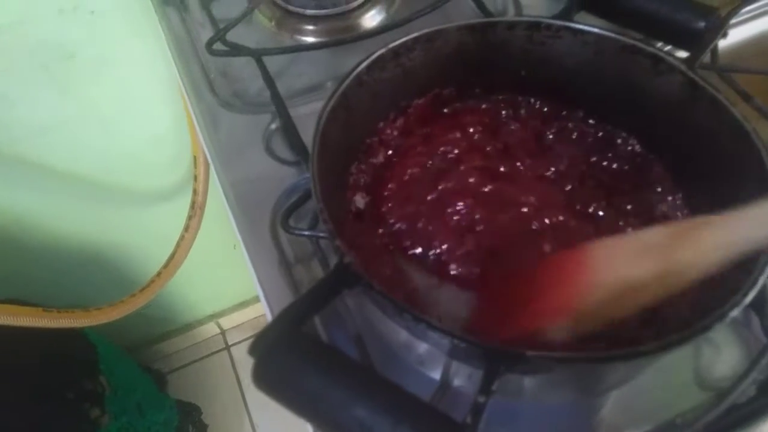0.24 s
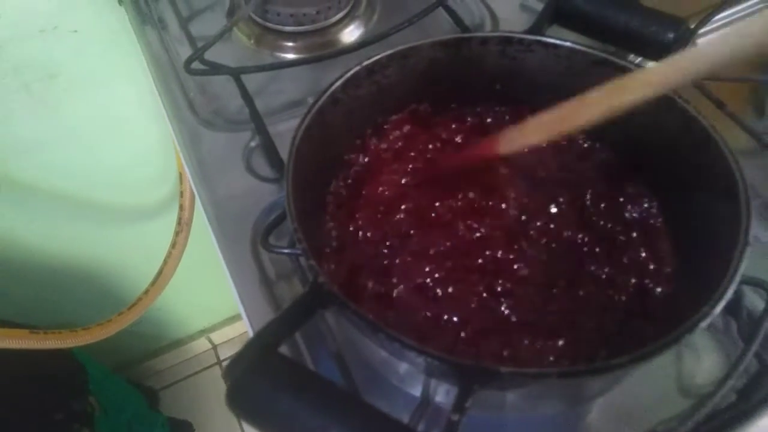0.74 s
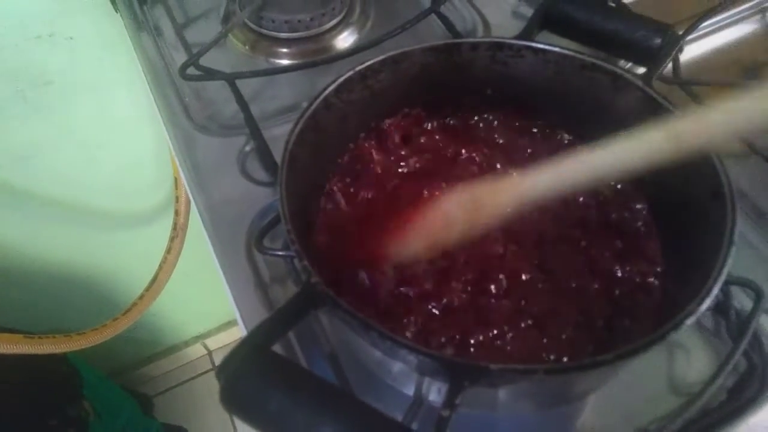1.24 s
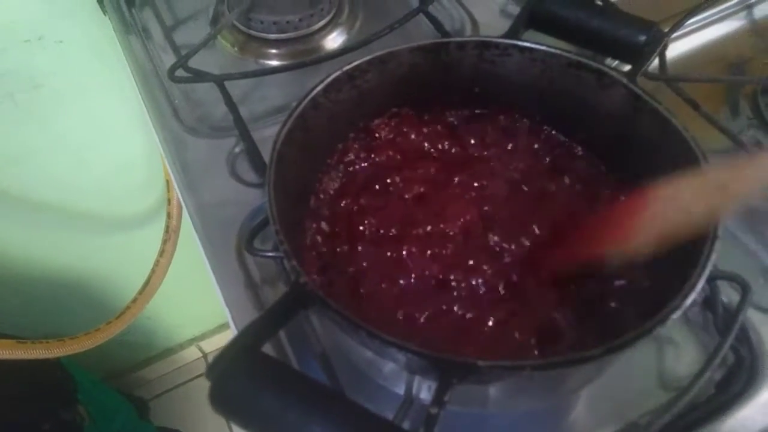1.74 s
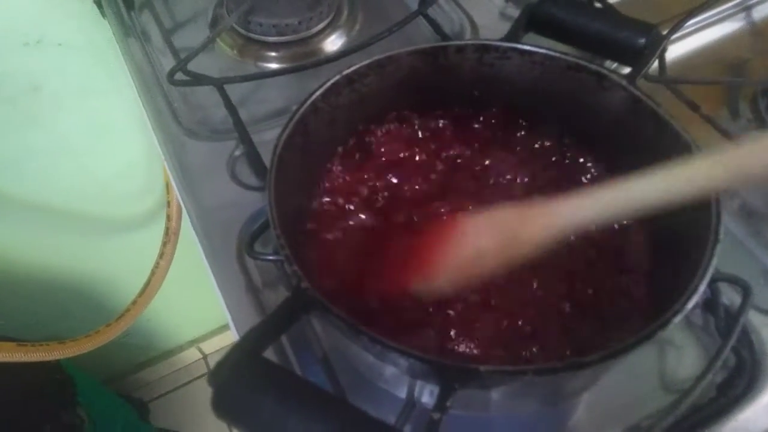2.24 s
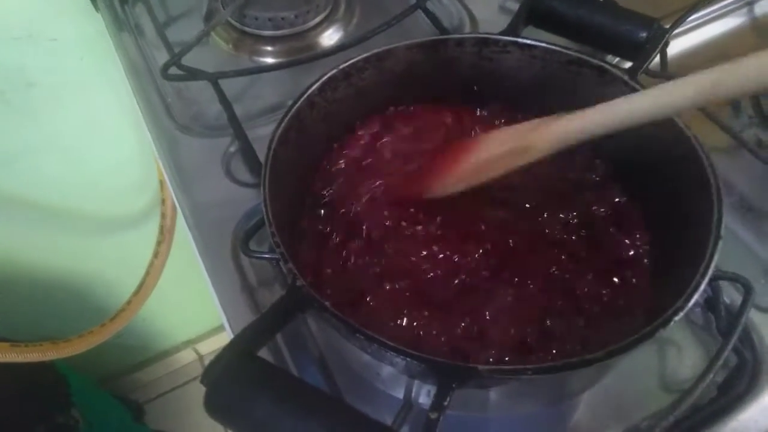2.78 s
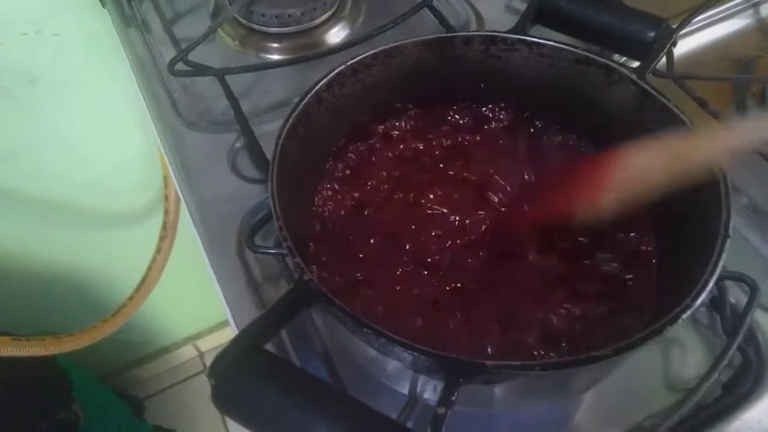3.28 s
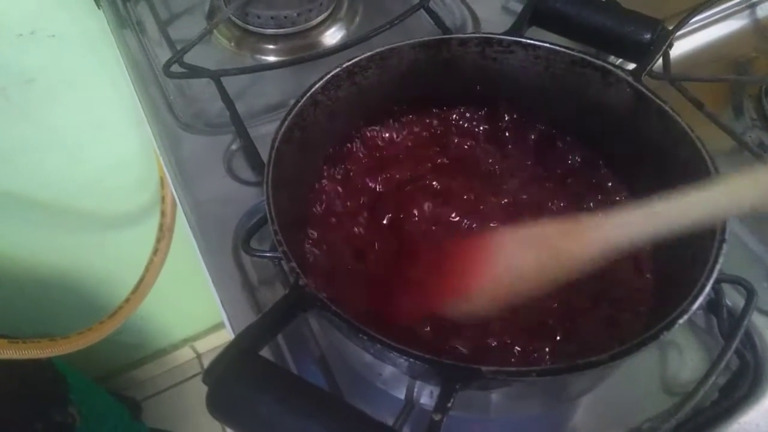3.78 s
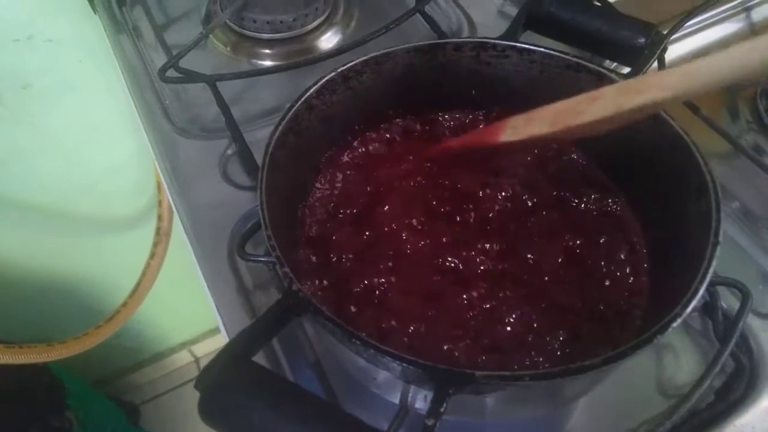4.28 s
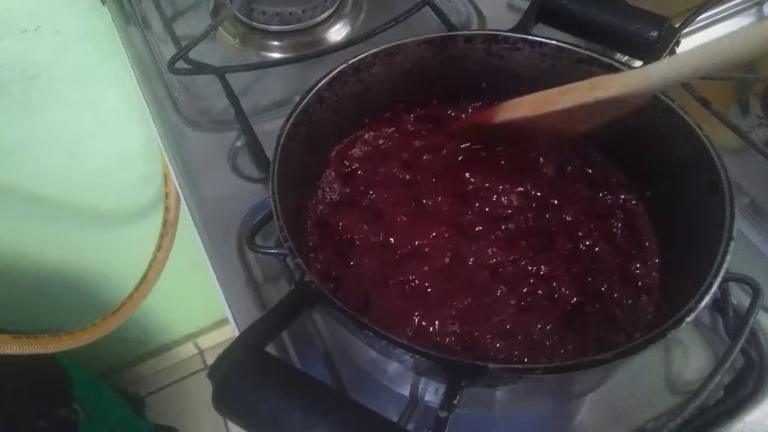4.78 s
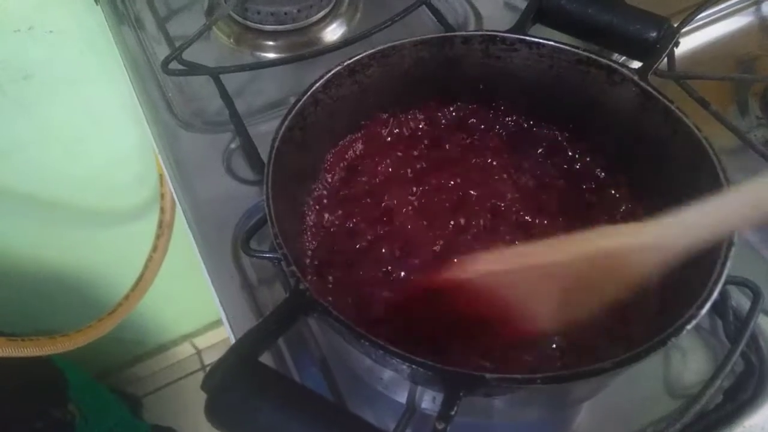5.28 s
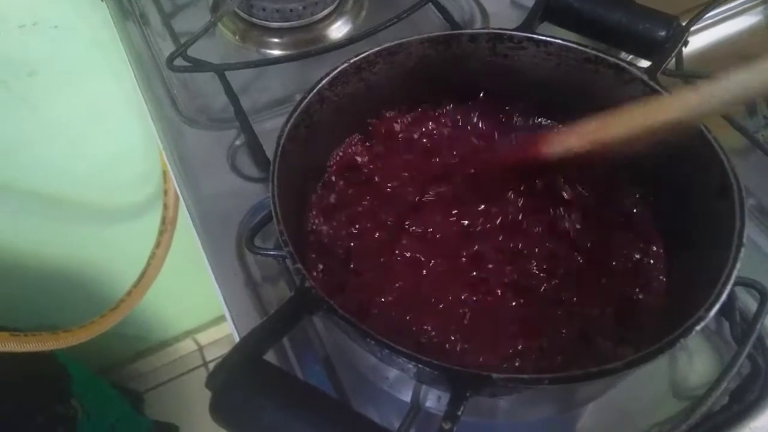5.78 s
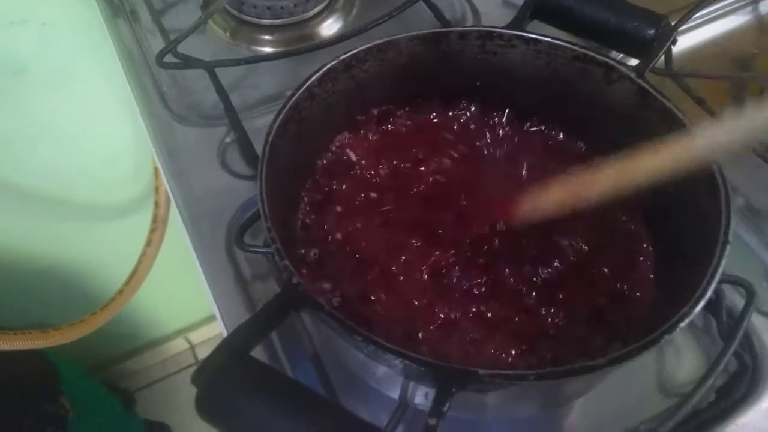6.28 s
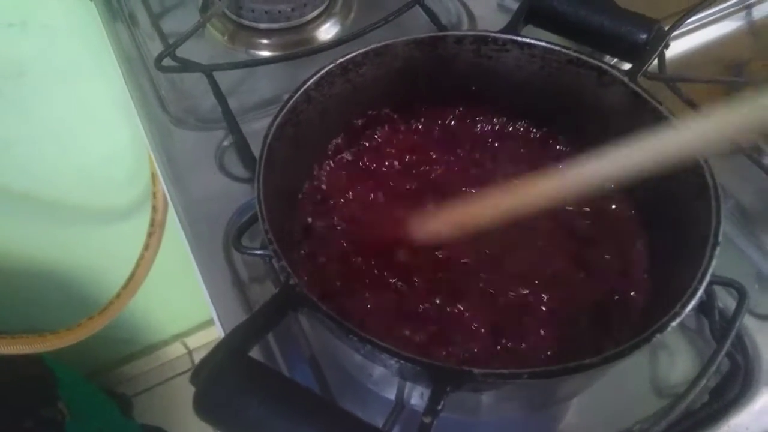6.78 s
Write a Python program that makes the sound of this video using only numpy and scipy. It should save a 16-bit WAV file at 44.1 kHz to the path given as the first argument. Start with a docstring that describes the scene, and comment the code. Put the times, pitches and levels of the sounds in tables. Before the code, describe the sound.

A wooden spoon scrapes and knocks dully in a metal pot while thick syrup bubbles, pops and hisses.

```python
"""First you hear a dull scrape over bubbling and hiss: a wooden spoon stirs thick, boiling syrup.
The spoon slips along the bottom of a metal pot, bubbles ring the air inside, and steam spits out.
Soon bubbles burst with sharp ticks and the spoon knocks the pot. A faint motor hums in the kitchen.
A hand bumps the camera it holds, whose two microphone openings colour the sound differently."""
import sys
import numpy as np
from scipy import signal
from scipy.fft import rfft, irfft, next_fast_len
from scipy.io import wavfile
from scipy.ndimage import uniform_filter1d, map_coordinates

SR = 44100
rng = np.random.default_rng(int(sys.argv[2]) if len(sys.argv) > 2 else 0)


def unload_audio(sound):
    """Save the sound as a 16-bit wav file, at the path given as the first command line argument."""
    columns = np.transpose(np.atleast_2d(sound))
    # keep every value between -1 and 1, then stretch to whole-number steps
    steps = np.round(np.clip(columns, -1, 1) * 32767)
    wavfile.write(sys.argv[1], SR, steps.astype(np.int16))


N = 310020
STEP = 64  # samples between the points of a loudness curve


def amp(db):
    """Turn decibels into a multiplier."""
    return 10 ** (np.asarray(db) / 20)

def unit(x):
    """Scale x to an average power of 1."""
    return x / np.sqrt(np.mean(x ** 2) + 1e-20)

def along(points, hz):
    """Read between (Hz, value) points, with octaves evenly spaced."""
    f, v = np.transpose(points)
    return np.interp(np.log(hz + 1), np.log(f + 1), v)

def curves(rows):
    """One value per sample for each column after the time."""
    s, *cols = np.transpose(rows)
    return [np.interp(np.arange(N) / SR, s, c) for c in cols]

def wobble(rate):
    """A smooth curve through `rate` random values a second."""
    at = np.arange(0, N + STEP, STEP // 4)
    values = rng.standard_normal(int(N * rate / SR) + 4)
    return np.interp(np.arange(N), at, map_coordinates(values, [at * rate / SR]))

def swell(peak_s, hold_s, rise_db_per_s, fall_db_per_s):
    """Each event rises to 0 dB, holds, then falls."""
    t = np.arange(0, N, STEP) / SR - np.reshape(peak_s, (-1, 1))
    rise, hold = np.reshape(rise_db_per_s, (-1, 1)), np.reshape(hold_s, (-1, 1))
    return np.minimum(rise * t, 0) - fall_db_per_s * np.maximum(t - hold, 0)

def together(tops_db, shapes_db, steady_db=-140):
    """The level in dB of overlapping events plus a steady part."""
    power = (amp(np.reshape(tops_db, (-1, 1)) + shapes_db) ** 2).sum(axis=0)
    return 10 * np.log10(np.interp(np.arange(N), np.arange(0, N, STEP), power) + amp(steady_db) ** 2)

def filtered(x, response):
    """Multiply each frequency in x by response(Hz)."""
    m = next_fast_len(N + SR // 2)
    return irfft(rfft(x, m) * response(np.fft.rfftfreq(m, 1 / SR)), m)[..., :N]

def band(x, lo_hz, hi_hz):
    """Keep what lies between two frequencies, at power 1."""
    return unit(filtered(x, lambda f: 1 / (1 + (lo_hz / (f + 1)) ** 10) / (1 + (f / hi_hz) ** 10)))

def peak(f, hz, width_hz):
    """A response that is 1 at hz and falls away on both sides."""
    return 1j * f * width_hz / (hz ** 2 - f * f + 1j * f * width_hz)

def hollow(x, hz, width_hz, depth):
    """Turn x down around hz."""
    return filtered(x, lambda f: 1 - depth * peak(f, hz, width_hz))

def resonance(x, hz, width_hz):
    """Make x ring around hz, at power 1."""
    b, a = signal.iirpeak(hz, hz / width_hz, SR)
    return unit(signal.lfilter(np.convolve(b, b), np.convolve(a, a), x))

def rush(spectrum, alike, patchy_db):
    """Stereo noise with louder and softer patches; alike=1 makes both sides the same."""
    z = signal.stft(rng.standard_normal((2, N)), nperseg=512)[2]
    patches = uniform_filter1d(rng.standard_normal(z.shape[1:]), size=2, axis=0)
    patches = uniform_filter1d(patches, size=9, axis=1)
    a, b = signal.istft(z * amp(patchy_db * unit(patches)), nperseg=512)[1][:, :N]
    turn = np.arccos(alike) / 2
    pair = np.cos(turn) * a + np.sin(turn) * np.array([b, -b])
    return unit(filtered(pair, lambda hz: amp(along(spectrum, hz))))

def grains(start, hz, cycles, gain, size):
    """Tiny tones, `size` samples long, that fade 60 dB in the given cycles."""
    turns = (np.arange(size) / SR * hz[:, None]).astype(np.float32)
    fade = np.exp(-turns * np.float32(np.log(1000) / np.reshape(cycles, (-1, 1))))
    onset = 1 - np.exp(-turns / 0.45)
    tones = gain[:, None] * np.sin(2 * np.pi * turns) * fade * onset
    at = start[:, None] + np.arange(size)
    return np.bincount(at.ravel(), tones.ravel(), N + size)[:N]

def shower(count, spread_db):
    """Random start samples, pitch scatter and strengths for grains."""
    u = rng.random((count, 2))
    gain = amp(-spread_db * np.log(1 - .99 * u[:, 1]))
    return (u[:, 0] * N).astype(int), rng.standard_normal(count), gain


# Drags of the spoon: t/s, rise/s, hold/s, level/dB, f/Hz
SPOON_DRAGS = [(0.0, 0.0067, 0.11, -44, 488), (0.216, 0.046, 0.022, -54.5, 517),
               (0.831, 0.017, 0.006, -38, 452), (1.039, 0.014, 0.029, -36, 538),
               (1.138, 0.03, 0.21, -36, 510), (1.572, 0.014, 0.014, -37.5, 483),
               (1.816, 0.071, 0.0079, -47, 560), (2.18, 0.043, 0.008, -32, 551),
               (2.299, 0.0093, 0.019, -33.5, 541), (2.622, 0.027, 0.046, -40.5, 541),
               (2.881, 0.012, 0.26, -38, 532.4), (3.316, 0.033, 0.21, -45, 558),
               (3.611, 0.053, 0.066, -33.5, 539), (4.632, 0.13, 0.25, -59.5, 488),
               (5.075, 0.098, 0.069, -46, 410), (5.424, 0.13, .01, -55.5, 586),
               (5.809, 0.019, 0.059, -41, 453), (6.046, 0.041, 0.043, -48.5, 474),
               (6.192, 0.036, 0.1, -35.5, 477), (6.408, 0.019, 0.038, -44.5, 490),
               (6.538, 0.056, 0.15, -41, 443), (6.72, 0.025, 0.3, -45.5, 479),
               (6.929, 0.064, 0.021, -29.5, 441)]

def spoon_scrapes():
    """The spoon moves in uneven slips; each briefly rings the bottom and stirs the air in the pot."""
    s, rise_s, hold_s, db, hz = np.transpose(SPOON_DRAGS)
    shape_db = swell(s + rise_s, hold_s, rise_db_per_s=17.5 / rise_s, fall_db_per_s=175)
    loudest = (db[:, None] + shape_db).argmax(axis=0)
    pitch = np.repeat(hz[loudest], STEP)
    start, scatter, gain = shower(count=2000, spread_db=2)
    slips = unit(grains(start, pitch[start] * np.exp(0.1604 * scatter), 36.7, gain, size=1600))
    rasp = unit(grains(start, 1000 * np.exp(0.333 * scatter), 38, gain, size=800))
    return amp(together(db, shape_db)) * (slips + amp(-15) * rasp)

def wood_on_pot(x):
    """A small pot gives little bass, and soft wood little treble."""
    stereo = x * amp([[-.8], [.8]])
    return filtered(stereo, lambda f: (1j * f / (260 + 1j * f)) ** 2 / (1 + 1j * f / 2400) ** 4)


# How long the room rings: f/Hz, time to fade 60 dB/s
ROOM_FADE = [(200, 0.028), (2000, 0.23), (10000, 0.014)]

def kitchen(x, echo_db):
    """Add the room's echo, each frequency dying at its own speed."""
    hz, t, z = signal.stft(rng.standard_normal((2, SR // 2)), SR, nperseg=256)
    tail = signal.istft(z * amp(-60 * t / along(ROOM_FADE, hz)[:, None]), SR, nperseg=256)[1]
    tail = np.pad(tail, ((0, 0), (300, 0))) / np.linalg.norm(tail[0])
    return x + amp(echo_db) * signal.fftconvolve(x, tail, axes=1)[:, :N]


# Notes of the air in the pot: f/Hz, width/Hz, relative level/dB, left over right/dB
POT_NOTES = [(947.4, 95, 0.5, 5.5), (1292, 119, 0, 15), (1882, 151, -1, 18.5), (2060, 138, 7, 9),
             (2340, 143, -2.5, -17.5)]

def pot_air(drive, drift=.035):
    """The air rings at several notes, which wander as the syrup is pushed about."""
    notes = []
    for hz, width_hz, db, pan_db in POT_NOTES:
        blend = np.pi / 4 * (1 + np.tanh(wobble(5)))
        lower = np.cos(blend) * resonance(drive, hz * (1 - drift), width_hz)
        higher = np.sin(blend) * resonance(drive, hz * (1 + drift), width_hz)
        notes.append(amp([[db + pan_db / 2], [db - pan_db / 2]]) * (lower + higher))
    return notes


# Strength of the boil: t/s, lowest note's level/dB, upper notes' level/dB
BOIL_LEVELS = [(0.0, -51, -46), (0.21, -58.5, -52.5), (0.35, -64, -74), (0.43, -52, -61),
               (0.74, -73.5, -68.5), (1.06, -57, -76), (1.13, -59, -66), (1.19, -51.5, -52.5),
               (1.51, -60, -69.5), (1.74, -47.5, -60), (2.15, -63.5, -61.5), (2.23, -45, -48),
               (2.31, -50.5, -56.5), (2.56, -53, -62), (2.92, -48, -47), (3.19, -52.5, -62),
               (3.8, -43, -47.5), (3.93, -68, -74), (4.05, -52, -62.5), (4.25, -62, -60.5),
               (5.33, -50.5, -57.5), (5.38, -70, -69), (5.52, -59.5, -57.5), (5.8, -59.5, -73),
               (5.87, -54.5, -51), (6.02, -64.5, -67), (6.13, -58, -66.5), (6.19, -45, -47.5),
               (6.36, -62.5, -56), (6.99, -60.5, -55)]
# Gurgles of the pot's second note: t/s, hold/s, level/dB
GURGLE_SWELLS = [(0.103, 0.036, -65), (0.897, 0.087, -59), (1.16, 0.065, -62), (1.857, 0.2, -63.5),
                 (2.24, 0.017, -57), (2.393, 0.013, -58), (2.633, 0.051, -54.5), (2.97, 0.12, -62.5),
                 (3.331, 0.099, -57.5), (3.632, 0.14, -56), (4.022, 0.11, -60), (4.693, 0.023, -67),
                 (5.097, 0.1, -63), (5.457, 0.21, -63.5), (5.835, 0.011, -59.5), (6.175, 0.21, -57),
                 (6.74, 0.17, -58)]

def boil():
    """Bubbles under the surface make soft thuds and a murmur that ring the air in the pot."""
    low_db, upper_db = curves(BOIL_LEVELS)
    s, hold_s, db = np.transpose(GURGLE_SWELLS)
    gurgle_db = together(db, swell(s, hold_s, rise_db_per_s=202, fall_db_per_s=138), steady_db=-79)
    start, scatter, gain = shower(count=2500, spread_db=2.5)
    thuds = unit(grains(start, 1500 * np.exp(0.81 * scatter), 1.72, gain, size=300))
    murmur = rush([(500, 0), (3000, 0)], alike=0.3, patchy_db=4.5) * amp(1.63 * wobble(4))
    low, gurgle, *rest = pot_air(0.54 * thuds + murmur)
    thin_tone = amp(-4.5) * np.sin(2 * np.pi * 850 * np.arange(N) / SR + 0.81 * wobble(5.5))
    upper = unit(sum(amp(3 * wobble(14)) * note for note in rest))
    low = amp(low_db + 2.2 * wobble(9)) * (low + thin_tone)
    return low + amp(gurgle_db) * gurgle + amp(upper_db) * upper


# Tone colour of the hiss: f/Hz, relative level/dB
HISS_COLOUR = [(2300, 0.5), (3050, 0), (3830, 2.5), (4700, -2.5), (5000, -10.5), (5500, -5.5), (7300, 3),
               (9000, 3.5), (10500, 2.5), (12600, -10.5), (14000, -23.5), (15600, -13.5)]
# Notes of the simmer: f/Hz, width/Hz, relative level/dB
SIMMER_NOTES = [(3576, 100, 5.5), (4135, 320, 18), (4520, 190, 11)]
# Steady flow of steam: t/s, low part's level/dB, bright part's level/dB
STEAM_FLOW = [(0.0, -52.5, -87), (0.27, -78, -50.5), (0.51, -94, -63.5), (0.78, -69, -64.5),
              (1.11, -72.5, -58), (1.39, -68, -58.5), (1.84, -61, -59), (2.17, -53, -56.5),
              (2.56, -58.5, -63), (2.78, -51, -55.5), (2.96, -60.5, -65.5), (3.23, -53.5, -62.5),
              (3.46, -52, -63), (3.6, -50.5, -62), (3.7, -51, -60), (3.82, -68, -70), (4.03, -58.5, -62.5),
              (4.21, -61.5, -55.5), (4.4, -56, -63), (4.58, -66.5, -63.5), (4.84, -55.5, -66.5),
              (5.19, -53.5, -55), (5.6, -66, -64.5), (6.15, -65, -65), (6.21, -51.5, -59),
              (6.34, -61.5, -64.5), (6.58, -67.5, -67.5), (6.73, -63, -72), (7.03, -52.5, -52.5)]
# Spurts of steam, each with its own loudness: t/s, hold/s, bright part's level/dB, top part's level/dB
STEAM_SPURTS = [(0.0, 0.052, -45, -47.5), (0.127, 0.012, -46, -53), (1.184, 0.014, -47, -44),
                (1.412, 0.089, -48.5, -53.5), (1.568, 0.042, -46, -78), (1.763, 0.011, -48, -111),
                (2.239, 0.0089, -50, -62), (2.336, 0.015, -51, -63), (2.546, 0.0089, -73, -59),
                (2.728, 0.033, -62, -72), (2.901, 0.07, -54.5, -61), (3.033, 0.015, -52, -55),
                (3.295, 0.026, -70, -56), (3.44, 0.066, -45.5, -48), (3.614, 0.024, -43.5, -43),
                (3.755, 0.016, -44, -53.5), (4.736, 0.016, -51.5, -56.5), (5.055, 0.19, -52, -82),
                (5.27, .01, -69, -58), (5.503, 0.077, -45.5, -46.5), (5.92, 0.007, -47.5, -59),
                (6.268, 0.026, -69, -59), (6.556, 0.013, -64, -61), (6.615, 0.13, -47, -75),
                (6.807, 0.099, -53.5, -67)]

def steam():
    """Escaping steam simmers, fizzes and crackles. Faint, brief high tones dot the hiss."""
    def colour(x):
        return unit(filtered(x, lambda f: amp(along(HISS_COLOUR, f))))
    start, scatter, gain = shower(count=10000, spread_db=4)
    fizz = grains(start, np.clip(7500 * np.exp(0.28 * scatter), 2000, 16000), 14, gain, size=100)
    start, scatter, gain = shower(count=2500, spread_db=-2)
    tone_hz = np.clip(7500 * np.exp(0.42 * scatter), 2500, 16000)
    brief_tones = grains(start, tone_hz, 215, gain, size=1200)
    jet = rush(HISS_COLOUR, alike=0.022, patchy_db=6) + 0.08 * colour(fizz) + 0.35 * colour(brief_tones)
    murmur = rush([(4000, 0)], alike=.3, patchy_db=5) + .15 * unit(fizz)
    simmer = unit(sum(amp(db + 3.5 * wobble(6.2)) * resonance(murmur, hz, width_hz)
                      for hz, width_hz, db in SIMMER_NOTES))

    low_db, steady_db = curves(STEAM_FLOW)
    s, hold_s, spurt_bright_db, spurt_top_db = np.transpose(STEAM_SPURTS)
    shape_db = swell(s, hold_s, rise_db_per_s=453, fall_db_per_s=286)
    bright_db = together(spurt_bright_db, shape_db, steady_db)
    top_db = together(spurt_top_db, shape_db, steady_db - 9)
    low = amp(low_db) * (simmer + 0.56 * band(jet, 2100, 5400))

    start, scatter, gain = shower(count=1500, spread_db=8.5)
    gain = gain * amp(4 * wobble(11))[start]  # loud ticks come in clusters
    crackle = grains(start, np.clip(8000 * np.exp(0.38 * scatter), 3500, 15000), 130, gain, size=700)
    sputter = (jet + .7 * colour(crackle)) * amp(2 * wobble(70))
    bright = amp(bright_db + 2 * wobble(11)) * band(sputter, 3040, 8620)
    top = amp(top_db + 3.3 * wobble(17)) * band(sputter, 11350, 28000)
    return low + bright + top


# High notes of the pot: f/Hz, boost/dB
SHEEN_NOTES = [(4620, 4), (5450, 1), (6000, 6), (6500, 5), (7450, 4), (8100, 5), (8900, 5.5)]

def pot_sheen(x, width_hz=200):
    """The pot's high notes lift narrow bands of x; the overall power stays the same."""
    def lift(f):
        return np.prod([1 + (amp(db) - 1) * peak(f, hz, width_hz) for hz, db in SHEEN_NOTES], axis=0)
    return unit(filtered(x, lift)) * np.sqrt(np.mean(x ** 2))


# Tone colour of the rumble: f/Hz, relative level/dB
RUMBLE_COLOUR = [(15, -51), (25, -11), (59, 20), (140, 8.5), (172, 7.5), (200, -18), (260, -30), (340, -39),
                 (570, -120)]
# Bumps of the hand: t/s, hold/s, level/dB
HAND_BUMPS = [(0.123, .02, -46), (0.184, 0.012, -41.5), (0.887, 0.036, -58), (1.454, 0.018, -60),
              (1.557, 0.2, -57.5), (2.232, 0.028, -55), (2.407, 0.17, -64), (3.49, 0.16, -57),
              (4.763, .05, -60), (5.575, 0.021, -59), (5.897, 0.031, -57), (6.178, 0.17, -56.5)]

def hand_rumble():
    """A low rumble swells when the hand bumps the camera; strong bumps lean to the left."""
    s, hold_s, db = np.transpose(HAND_BUMPS)
    level_db = together(db, swell(s, hold_s, rise_db_per_s=229, fall_db_per_s=175), steady_db=-68)
    lumps = amp(1.8 * wobble(11))
    lean_db = 0.26 * np.clip(level_db + 62, 0, 30)
    rumble = lumps * rush(RUMBLE_COLOUR, alike=0.4, patchy_db=2)
    return amp(level_db + np.array([lean_db, -lean_db])) * rumble


# The motor's tone: f/Hz, level/dB
MOTOR_TONE = [(169, -66)]

def motor_hum():
    """A faint motor hums, wavering a little in loudness and pitch."""
    t = np.arange(N) / SR
    return sum(amp(db + 2.5 * wobble(3.3)) * np.sin(2 * np.pi * hz * t + 0.66 * wobble(4.1))
               for hz, db in MOTOR_TONE)


# Bursting bubbles: t/s, level/dB, f/Hz, left over right/dB, width/octaves,
# puff's relative level/dB, puff's time to fade 60 dB/s
BURSTS = [(0.426, -37, 5100, 6, 0.2, -6, 0.21), (0.6601, -24, 4500, 3.5, 0.24, -26, 0.27),
          (1.18, -25, 7150, -0.5, 1, -17, 0.43), (1.315, -35.5, 3800, -1, 0.51, -4, 0.12),
          (1.422, -17.5, 6600, -6.5, 0.53, -21, 0.062), (1.712, -37, 13500, 16, 0.14, -22, 0.24),
          (1.77, -35, 4900, 3, 0.56, -12.5, 0.54), (1.885, -39.5, 7800, 2, 0.61, -12, 0.079),
          (2.135, -37.5, 4700, -4, 0.26, -34, 0.076), (2.2253, -26, 6000, 0, 0.29, -23.5, 0.45),
          (2.3349, -27, 7640, -10, 0.46, -22.5, 0.22), (2.561, -42, 11200, 15, 0.21, -24, 0.26),
          (2.725, -34, 5670, -5, 0.82, -11, 0.21), (2.742, -18, 5500, -2.5, 0.44, -33, 0.93),
          (2.773, -27.5, 6060, 3, 0.3, -18, 0.089), (2.7942, -31, 5890, -5, 0.34, -18, 0.13),
          (3.113, -26, 5720, 6, 0.18, -26, 0.28), (3.449, -24, 5870, 0.4, 0.54, -17, 0.22),
          (3.459, -24.5, 5900, -7, 0.13, -16, 0.086), (3.5207, -25.5, 5000, -6, 0.59, -15.5, 0.29),
          (3.6048, -38, 5500, 1, 0.22, -4, 0.34), (3.6197, -25.5, 5900, 9.5, 1, -22, 0.38),
          (3.768, -22.5, 9600, 0, 0.26, -24, 0.2), (3.8276, -39, 8300, 12.5, 0.21, -17, 0.15),
          (4.568, -31.5, 3460, -4, 0.17, -17, 0.39), (4.7258, -43, 4370, -11, 0.12, -21.5, 0.97),
          (4.965, -44.5, 6540, 0, 0.52, -12.5, 0.44), (5.141, -33.5, 4230, -2, 0.19, -13, 0.38),
          (5.268, -34.5, 9000, 14, 0.98, -18, 0.052), (5.2959, -47, 4550, 4, 0.3, -16, 0.1),
          (5.31, -24.5, 4800, -3, 0.25, -16, 0.16), (5.4842, -31, 4020, 5, 0.26, -9, 0.33),
          (5.5035, -17, 6150, -7, 0.99, -17.5, 0.21), (5.54, -14, 9250, 19.5, 1, -24.5, 0.11),
          (5.553, -26, 7540, 6, 0.34, -26, 0.36), (5.9194, -39.5, 4470, -6, 0.13, -18, 0.15),
          (6.2662, -30, 8600, 20, 0.66, -35.5, 0.46), (6.518, -42, 6100, -15, 0.25, -22, 0.1),
          (6.542, -35.5, 5040, 0, 0.65, -11, 0.18), (6.6195, -23, 6220, -11, 0.34, -27, 0.18),
          (6.6255, -29, 5030, -5, 0.3, -30, 0.1), (6.8145, -24, 4940, -2, 0.41, -20, 0.32),
          (6.852, -24.5, 4970, -6, 0.56, -22, 0.4), (6.9062, -18, 4440, 3, 0.42, -21.5, 0.13)]

def bubble_pops():
    """A bubble's skin snaps with a tick, droplets spatter, and steam puffs out around that pitch."""
    out, t = np.zeros((2, N + SR)), np.arange(SR // 5) / SR
    f = np.fft.rfftfreq(len(t), 1 / SR)
    sputter = np.pad(amp(4.5 * wobble(120)), (0, SR))
    for s, db, hz, pan_db, width, puff_db, fade_s in BURSTS:
        at = round(s * SR)
        life_s = 0.52 / (width * hz)  # a narrow tick rings longer
        tick = np.cos(2 * np.pi * hz * t) * np.exp(-(t / life_s - 2) ** 2)
        delays_s = np.cumsum(rng.exponential(.011, size=4))
        droplets = sum(amp(-12 - 6 * k + rng.normal(0, 2.5)) * np.roll(tick, round(delay * SR))
                       for k, delay in enumerate(delays_s))
        spectrum = rfft(rng.standard_normal((2, len(t)))) * np.exp(-(np.log2((f + 1) / hz) / width) ** 2)
        ripples = amp(5 * unit(uniform_filter1d(rng.standard_normal(len(f)), size=50)))
        puff = unit(irfft(spectrum * ripples, len(t))) * sputter[at:at + len(t)]
        onset = 1 - np.exp(-t / 0.00095)
        fade = 0.095 * amp(-60 * t / 0.0078) + amp(puff_db - 60 * t / fade_s)
        pop = tick + droplets + puff * onset * fade
        out[:, at:at + len(t)] += amp(db) * pop * amp([[pan_db / 2], [-pan_db / 2]])
    return filtered(out[:, :N], lambda f: 1 / (1 + (3200 / (f + 1)) ** 8))  # the pops carry nothing below about 3 kHz


# Knocks of the spoon: t/s, level/dB, f/Hz, crispness/dB, ring length/cycles
SPOON_HITS = [(0.839, -8.5, 480, -37, 7.3), (0.894, -19, 486, -18, 6.9), (1.026, -3.5, 587, -34, 7.2),
              (1.062, -25, 526, -24, 8.4), (1.151, -32, 523, -21, 24), (1.177, -18, 520, -21.5, 27),
              (1.221, -22, 530, -34, 14), (1.233, -17.5, 568, -40, 19), (1.303, -11.5, 554, -39, 11.3),
              (1.575, -26, 633, -28, 25), (1.6, -23, 498, -38, 20), (2.07, -26, 695, -23, 9.4),
              (2.205, -26.5, 530, -28, 28), (2.218, -30, 604, -1, 6.4), (2.31, -30.5, 429, -32, 82),
              (2.643, -30, 499, -31, 85), (2.888, -25, 465, -28, 12.6), (3.36, -26.5, 650, -34, 29),
              (3.506, -35, 560, 1.5, 8.6), (3.612, -16.5, 527, -19.5, 36), (3.622, -14.5, 456, -32, 9.1),
              (3.796, -20, 486, -18, 11.4), (5.16, -18, 395, -26, 3.4), (5.249, -21, 358, -44, 6.3),
              (5.505, -30, 616, -22, 12), (5.533, -25, 566, -30, 7.1), (6.035, -38.5, 740, -7, 64),
              (6.172, -12.5, 578, -8.5, 11.6), (6.31, -18, 468, -24, 11), (6.322, -16.5, 456, -30, 16),
              (6.553, -31, 473, -29, 17), (6.617, -24, 346, -29, 44), (6.644, -19, 451, -40, 55),
              (6.655, -17.5, 476, -37, 62), (6.693, -21, 448, -43, 39), (6.823, -25, 454, -47, 32),
              (7.006, -32.5, 450, -3, 12)]
# Higher notes of a knock: f/Hz, relative level/dB, time to fade 60 dB/s
KNOCK_NOTES = [(933, 7.5, 0.021), (1475, 10.5, 0.0074), (1770, 4.5, 0.014)]

def spoon_knocks(late_samples=60):
    """The spoon thuds on the syrup-muffled bottom, and higher notes ring just after."""
    s, db, hz, crisp_db, cycles = np.transpose(SPOON_HITS)
    at = (s * SR).astype(int)
    knocks = grains(at, hz, cycles, amp(db), size=1600)
    for note_hz, note_db, fade_s in KNOCK_NOTES:
        gain = amp(db + crisp_db + note_db + rng.normal(0, 2, len(s)))
        knocks += grains(at + late_samples, np.full(len(s), note_hz), note_hz * fade_s, gain, size=1600)
    return knocks


def scene():
    """Mix the pot's dull and bright sounds with the rumble and the hum."""
    spoon = kitchen(wood_on_pot(spoon_scrapes() + spoon_knocks()), echo_db=-9)
    # The echo from the pot's wall cancels a narrow band.
    dull = hollow(spoon + boil(), hz=1138, width_hz=216, depth=0.91)
    bright = pot_sheen(kitchen(bubble_pops(), echo_db=-20) + steam())
    return dull + bright + hand_rumble() + motor_hum()


# Balance of the two microphone openings: f/Hz, left over right/dB
MIC_BALANCE = [(60, 5), (140, 3.5), (330, 2), (500, 4.5), (770, 13.5), (1170, 10), (1790, 3.5), (2740, 0.5),
               (4190, -17), (6410, -0.5), (9810, 2.5), (15000, 6.5)]
# The camera's own hiss: f/Hz, relative level/dB
MIC_HISS = [(30, -16), (100, -0.5), (300, -5.5), (700, -11.5), (1400, -23), (3000, -12), (8000, -87),
            (12500, -37), (14000, -67)]

def record(dry, left_lag_samples=3, top_hz=15500):
    """The camera colours each side, adds hiss, dips the upper middle and cuts the highest treble."""
    def openings(hz):
        left, right = amp(along(MIC_BALANCE, hz) / 2), amp(-along(MIC_BALANCE, hz) / 2)
        even = np.sqrt((left ** 2 + right ** 2) / 2)  # the pair keeps its average power
        return np.array([left * np.exp(-2j * np.pi * hz * left_lag_samples / SR), right]) / even
    hiss = amp(-64) * rush(MIC_HISS, alike=0.46, patchy_db=2)
    heard = hollow(filtered(dry, openings) + hiss, hz=2900, width_hz=800, depth=.55)
    return filtered(heard, lambda hz: hz < top_hz)


dry = scene()
out = record(dry)
unload_audio(out)
```